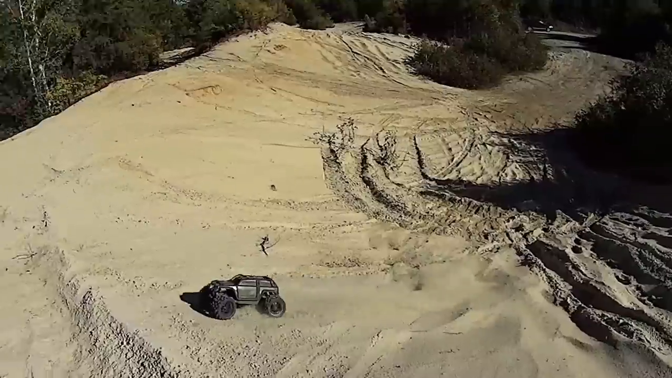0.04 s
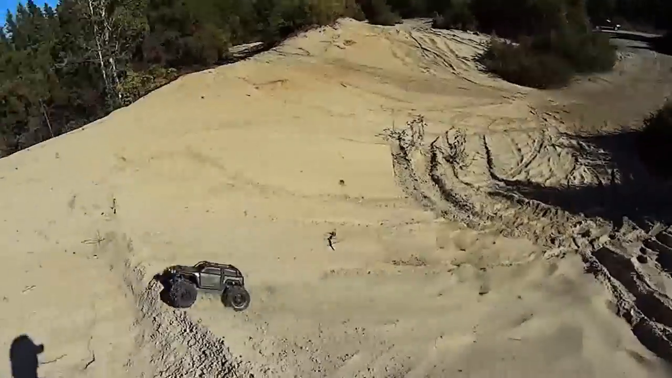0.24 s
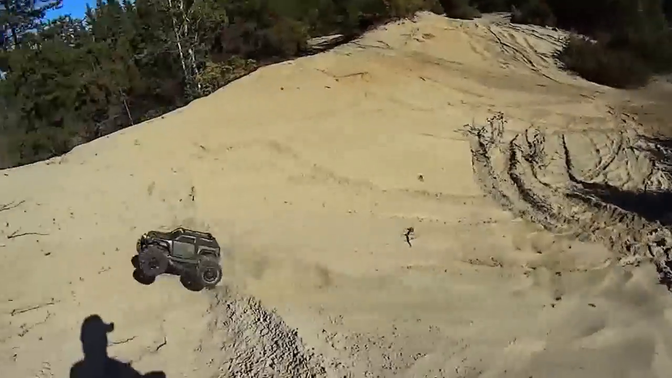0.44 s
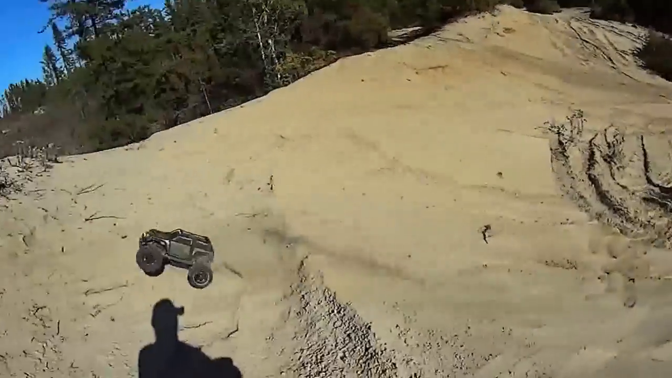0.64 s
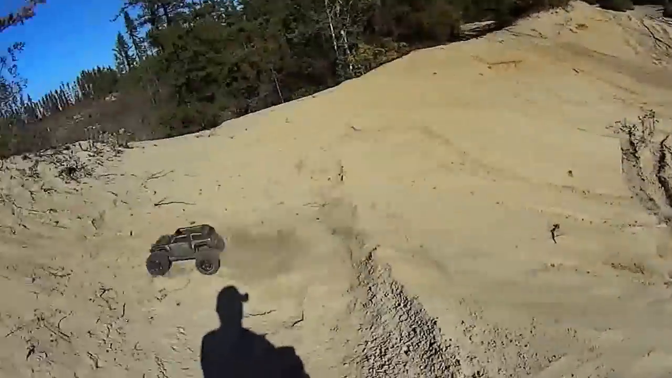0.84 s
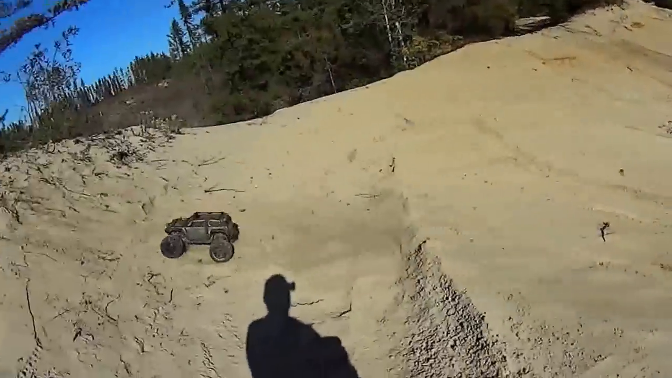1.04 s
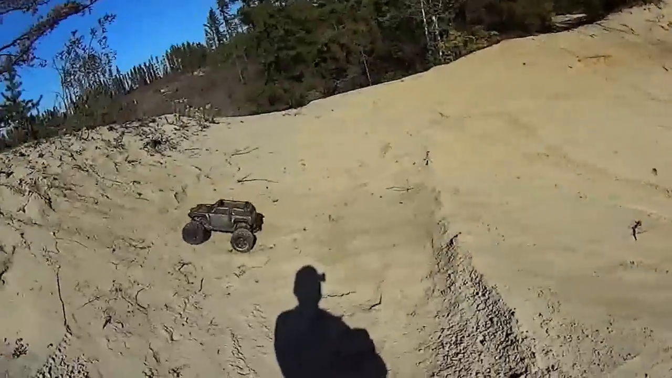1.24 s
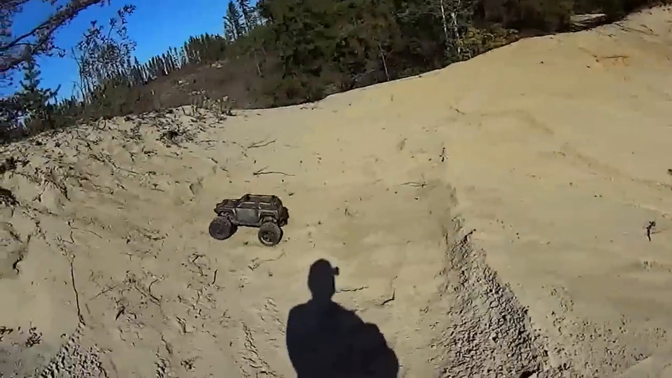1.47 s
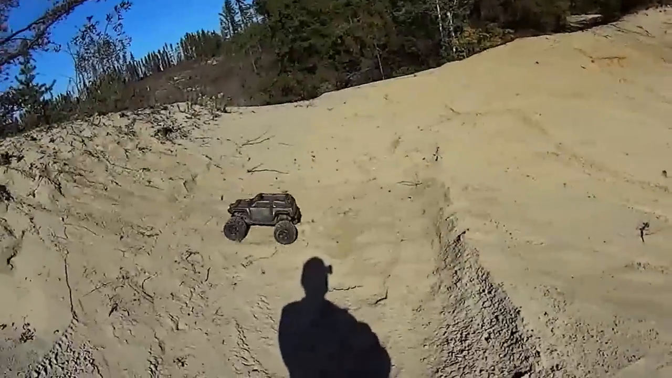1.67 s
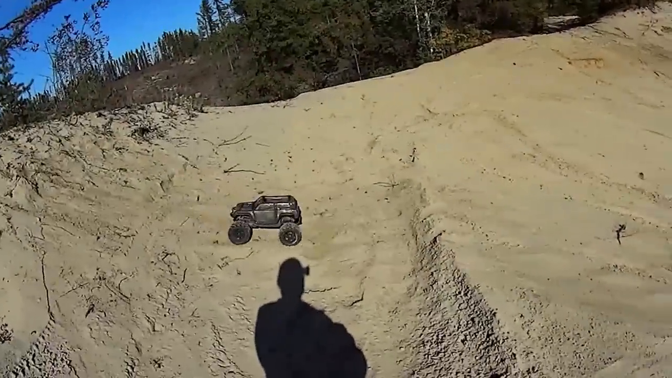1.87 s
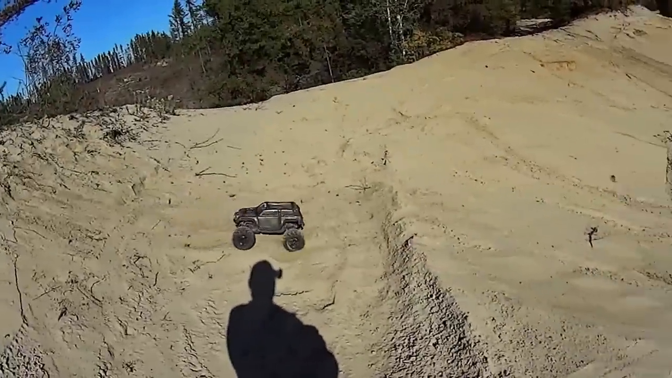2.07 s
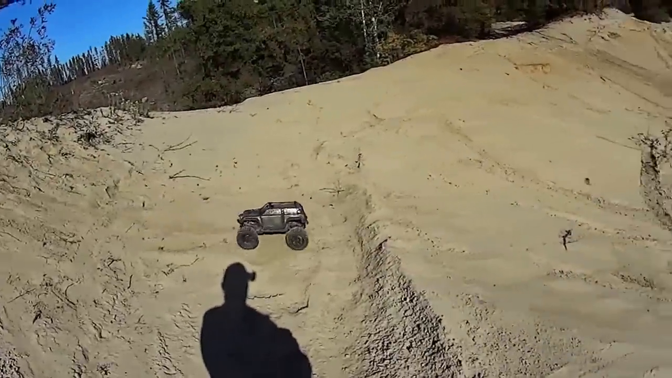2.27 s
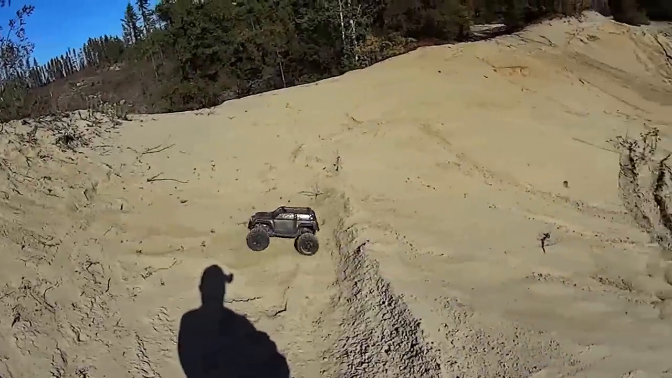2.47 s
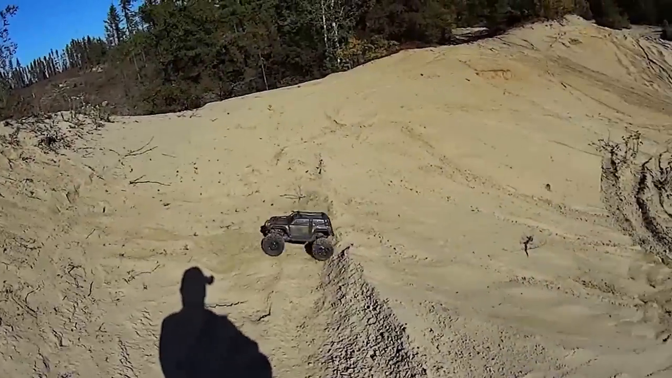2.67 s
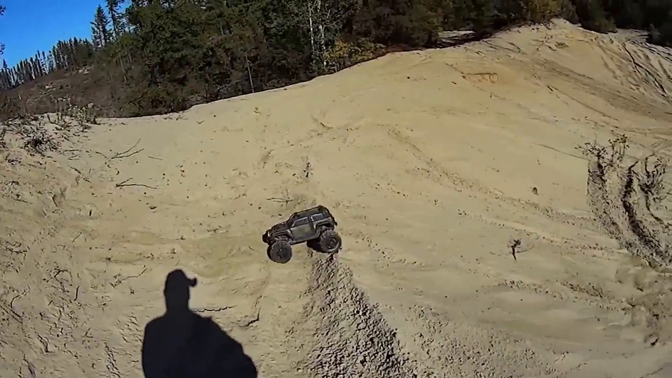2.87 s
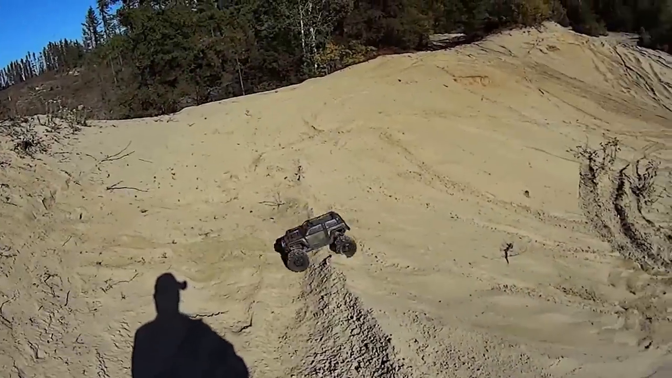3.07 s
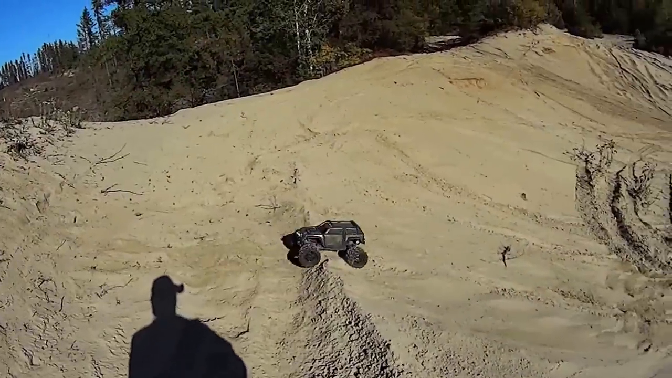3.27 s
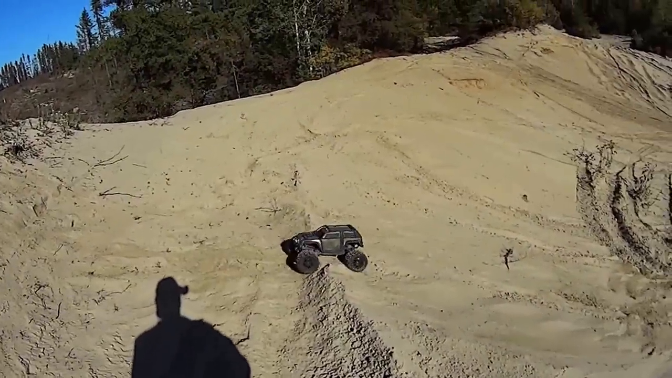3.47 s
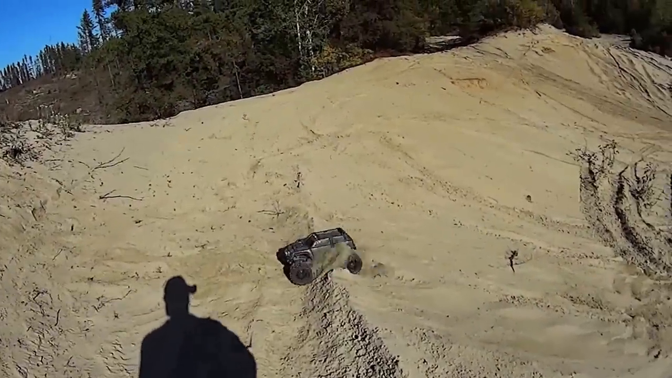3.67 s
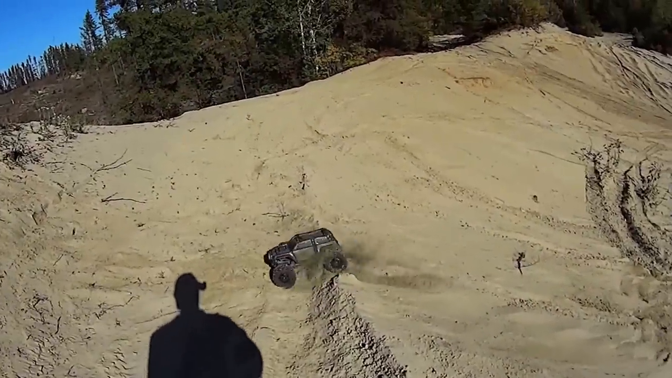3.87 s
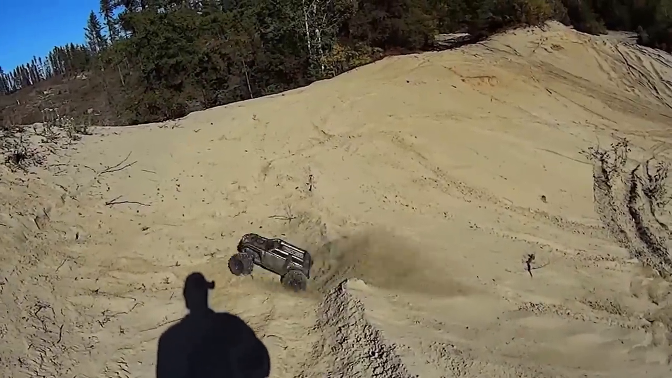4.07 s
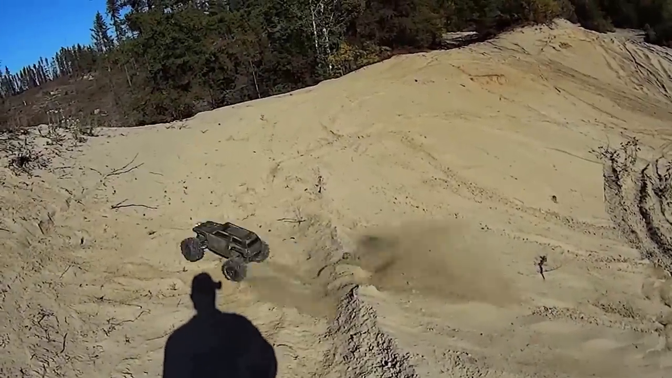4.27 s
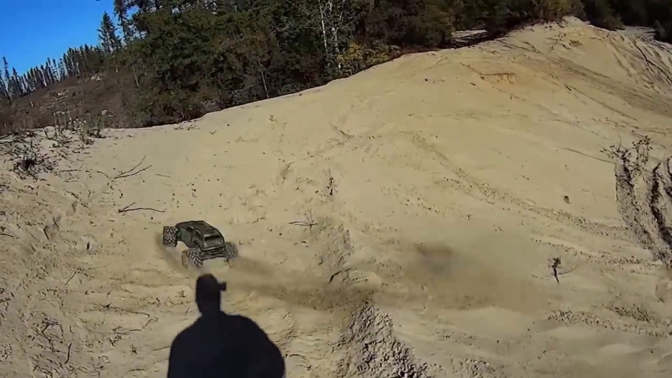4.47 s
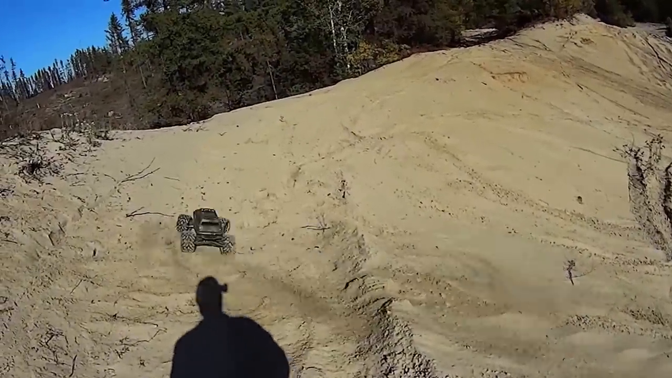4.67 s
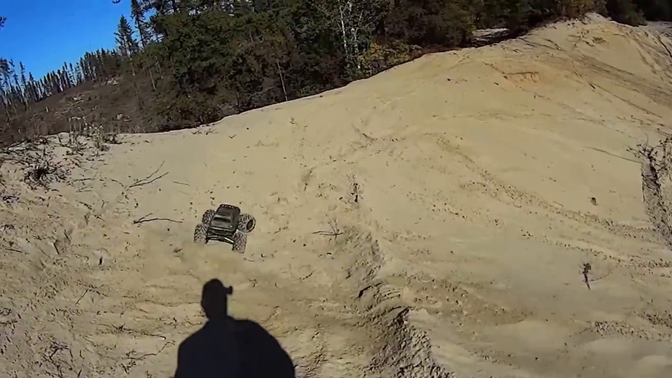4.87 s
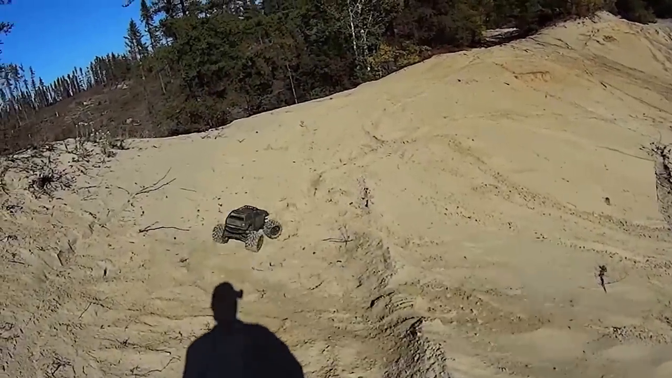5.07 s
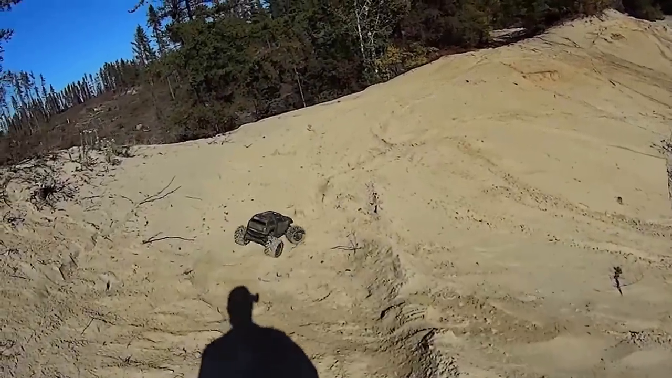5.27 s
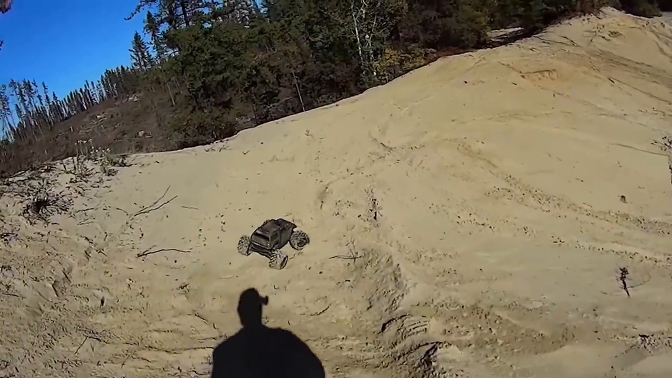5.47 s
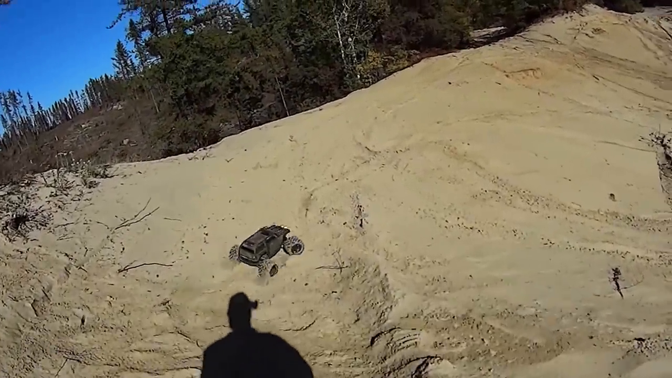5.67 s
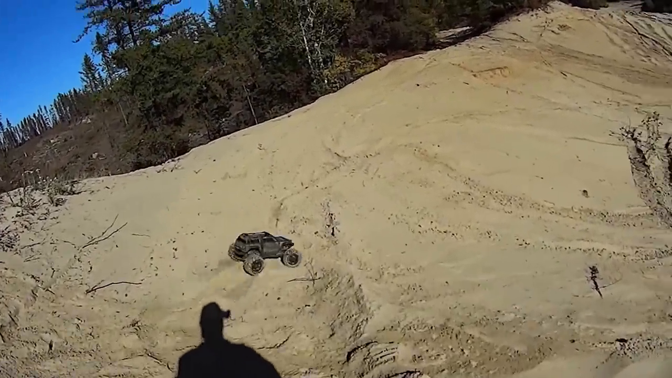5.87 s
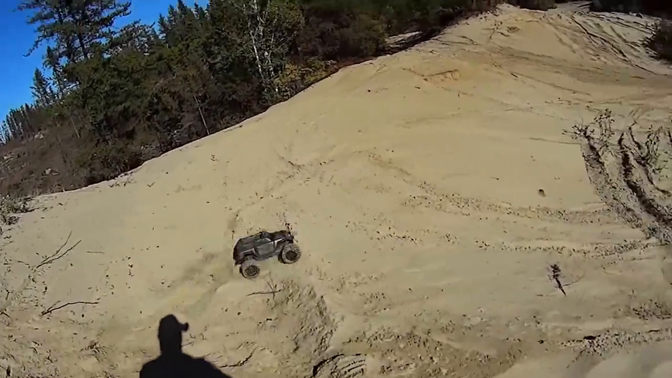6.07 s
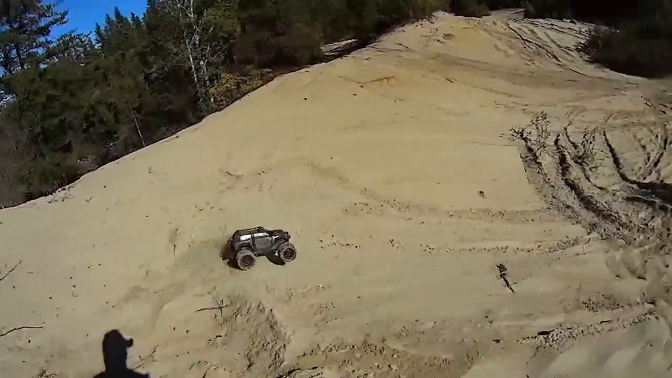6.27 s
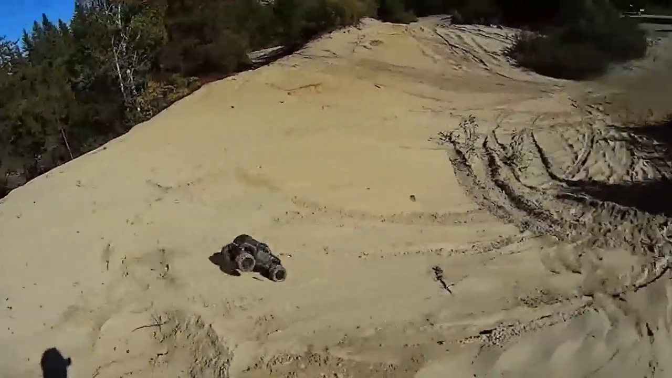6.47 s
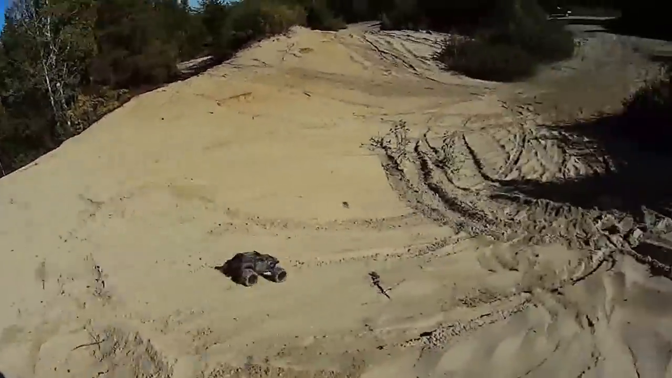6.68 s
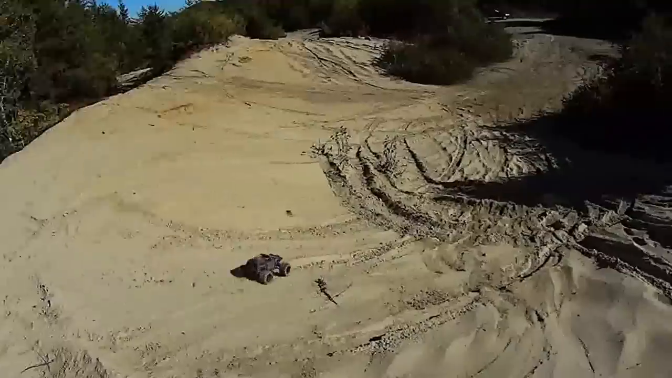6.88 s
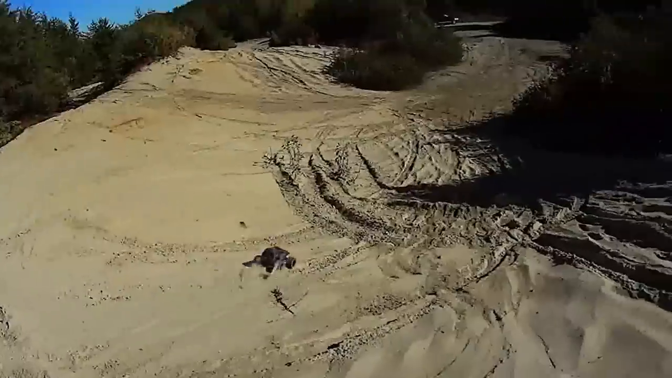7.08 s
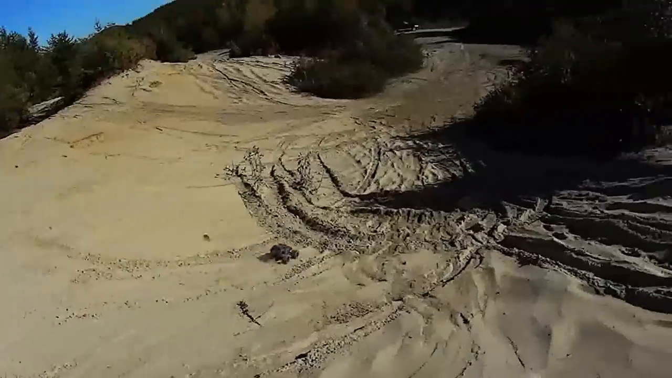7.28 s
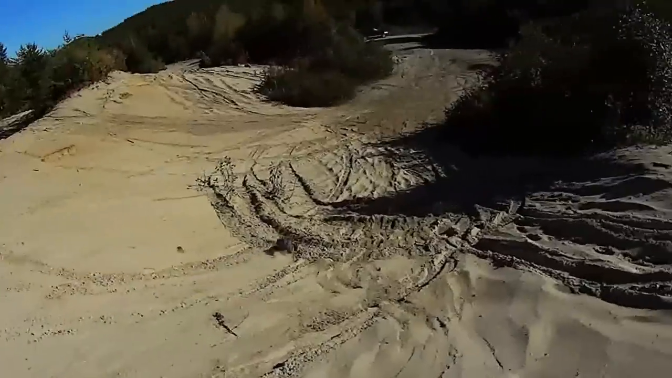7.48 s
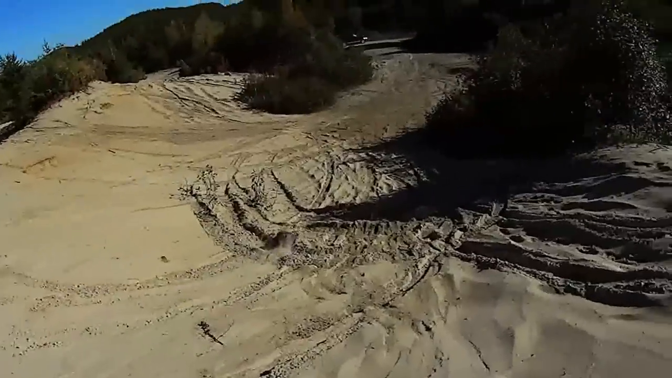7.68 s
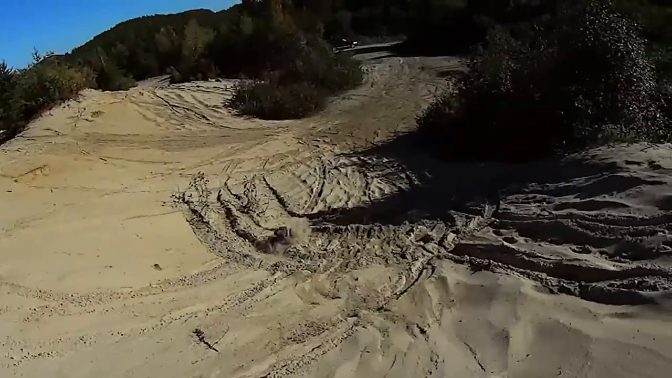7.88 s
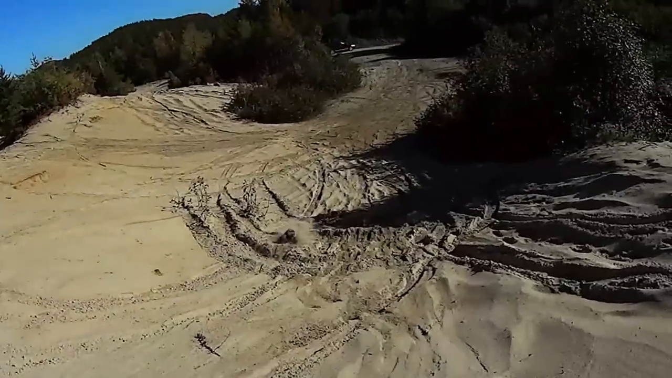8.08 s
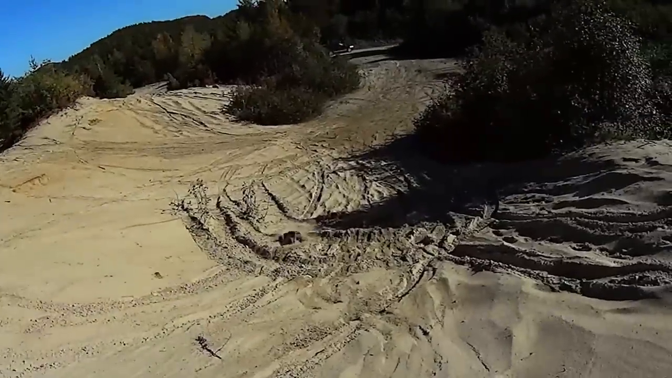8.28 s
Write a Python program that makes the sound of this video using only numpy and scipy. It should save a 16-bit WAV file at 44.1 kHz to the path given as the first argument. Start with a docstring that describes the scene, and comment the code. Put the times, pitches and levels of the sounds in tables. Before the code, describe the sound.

Outdoors on sand, a toy-sized electric truck screams, brakes with a rattle, creeps, stutters, races again, then whirs away in a rising final run.

```python
"""Electric model truck on sand

A remote-controlled truck runs three throttle bursts on a sand slope, a few metres away. Gear whine is summed
from shaft-speed multiples; grind, sand and tyres are shaped random impacts. Chatter, hull drone and tyres
drumming on ruts are impacts through resonances; rolling gears hold a wavering note. Stalled-motor kicks, thumps
and clacks are short decaying notes and noise bursts; a sine whistles at part throttle. Reflections, a stereo
pair and background air complete the scene."""
import sys
import numpy as np
from scipy import signal
from scipy.fft import rfft, irfft
from scipy.io import wavfile

SR = 44100
rng = np.random.default_rng(int(sys.argv[2]) if len(sys.argv) > 2 else 0)


def put_to_file(sound):
    """Save the sound as 16-bit audio at rate SR, in the file named by the first command-line argument."""
    columns = np.atleast_2d(sound).T  # one column per channel
    safe = np.clip(columns, -1, 1)
    whole_steps = np.round(safe * 32767)
    wavfile.write(sys.argv[1], SR, whole_steps.astype(np.int16))


N = 366912
T = np.arange(N) / SR
CLOCK = np.arange(0, N + 64, 64) / SR  # coarse time_s for slow gains
EDGE_HZ = 11170  # upper band limit

# Motor spins: whine_db, treble_db, overtone_db, comb_db (uneven teeth), axle_db, roughness_0_to_1,
# wobble_0_to_1 (bouncing wheels), speed curve [(time_s, tooth_hz)]
SPINS = [(-19, 9.5, -6, -6, 7, 0.045, 0.027, [(0, 5040), (0.16, 5015), (0.225, 5190), (0.268, 4950)]),
         (-21, -0.5, -3, -3, -8, 0.19, .004, [(0.278, 4800), (0.31, 4540), (0.335, 4650), (0.358, 4850)]),
         (-16.5, 10, -5, -14, -15, 0.048, .002, [(0.372, 4970), (0.408, 5240)]),
         (-19.5, -5, -6, -12, -10.5, 0.093, .004, [(0.415, 5300), (0.45, 5910), (0.487, 6530)]),
         (-21, 5, -5, -13, -6, 0.25, .004, [(3.497, 799), (3.52, 720), (3.535, 1216), (3.55, 1340)]),
         (-21, 2, -0.5, -8, -3, .15, 0.0091, [(3.555, 1450), (3.58, 1920), (3.612, 2386)]),
         (-21, 2, -1, 2, 3.5, 0.37, 0.015, [(3.62, 2692), (3.69, 3710), (3.74, 3800), (3.807, 3456),
         (3.86, 3720)]), (-20, -.5, -6, 3, -0.5, 0.27, 0.027, [(3.87, 3804), (3.92, 4404), (4.05, 4933),
         (4.09, 5020)]), (-19, 0, -5, 2, 9.5, 0.39, 0.0074, [(4.103, 4730), (4.135, 3780), (4.168, 2960)]),
         (-23, -4, 1, 5, -3.5, .5, 0.025, [(4.178, 2990), (4.195, 3996), (4.225, 4180), (4.25, 5100)]),
         (-26, -3, -6, -19, -8, 0.62, .01, [(5.53, 1008), (5.55, 715), (5.567, 887), (5.585, 700),
         (5.612, 950)]), (-22.5, -5.5, 2.5, -7, 0, 0.2, .003, [(5.62, 1110), (5.662, 1542), (5.684, 1540),
         (5.708, 1874), (5.726, 1699), (5.742, 1757), (5.766, 1667), (5.785, 1734), (5.808, 2010),
         (5.832, 1738), (5.854, 1953), (5.9, 2066), (5.918, 2050), (5.934, 1820)]),
         (-24.5, -7.5, 6, 3, 9, 0.36, .003, [(5.945, 1850), (5.968, 1786), (6.002, 2294)]),
         (-22.5, -4.5, 0.5, -0.5, 1.5, 0.21, .004, [(6.015, 1940), (6.035, 1977), (6.06, 1948),
         (6.09, 2220), (6.112, 2147), (6.138, 2144), (6.178, 1742), (6.2, 1813), (6.25, 2110),
         (6.266, 2224)]), (-26.5, -4, -1, -6, -2, 0.22, .005, [(6.326, 1854), (6.35, 1988)]),
         (-34.5, -12, 2, 9, 4, 0.22, 0.031, [(6.365, 2020), (6.41, 2140), (6.45, 1930), (6.49, 1904),
         (6.515, 2086)]), (-20, -12, -2, -14, -5, 0.17, 0.004, [(6.527, 2290), (6.543, 2140)]),
         (-34, -10, 10, 16, 3, 0.38, .025, [(6.56, 2000), (6.61, 2218), (6.675, 2890), (6.72, 3142),
         (6.74, 3715), (6.785, 4050)]), (-24.5, -9, 3.5, 1.5, -4, 0.057, 0.02, [(6.8, 4386), (6.85, 4396),
         (6.885, 4140), (6.92, 4433), (6.97, 4510)]), (-28.5, 5, 12.5, 7, 0, 0.22, 0.01, [(6.99, 4740),
         (7.065, 5537)]), (-34, -0.5, 1.5, -5, 7, 0.1, 0.0055, [(8.25, 1626), (8.262, 1310), (8.273, 766),
         (8.29, 1020), (8.3, 1275), (8.32, 1290)])]
# Gear tones: shaft_multiple, slow_db, fast_db
GEAR_TONES = [(2, -30, -6), (5, -24, -2), (7, -20, -24), (10, -24, -5), (15, -23, -11), (18, 0, 0),
              (20, -22, -10), (26, -25, -10), (36, -3.5, -4), (41, -15, -22), (46, -16, -30), (54, -7, -25),
              (59, -14, -40), (72, -6.5, -40), (90, -13, -40)]
# Falling zip as the brake stops the motor: start_s, level_db
BRAKE_ZIPS = [(0.881, -24), (4.484, -25.5)]
# Whine swell at the gearbox resonance: tooth_hz, gain_db
WHINE_GAIN = [(750, 0), (1100, 1), (1800, 6.5), (2050, 6.5), (2400, 1), (3000, -4), (4000, 1), (5100, -1),
              (6300, -0.5)]
# Gearbox radiation: frequency_hz, gain_db
HOUSING_GAIN = [(300, -4), (500, -1), (800, -4), (1250, 0), (1600, 0), (2050, 2), (2350, 0), (2650, -2),
                (2900, -9), (3300, -4), (3700, 1), (4100, 1.5), (4550, -3), (5000, 2.5), (5350, 3),
                (5900, -3), (7400, -1), (11000, -4)]
TEETH, AXLE_MULTIPLE = 18, 2
ZIP_S, ZIP_FROM_HZ, ZIP_TO_HZ = 0.014, 2600, 1108
BOUNCE_HZ, BOUNCE_SETTLE_S = 29, 0.3  # bouncing wheels load and unload the motor
DULL_DB_PER_OCTAVE, BRIGHT_HZ = 6, 1760  # below this tooth rate, teeth meet softly and treble fades
RACING_DB_PER_OCTAVE, RACING_HZ = -41, 5350  # above it, the unloaded pinion loses treble
RUNOUT_RAD = 0.35  # off-centre pinion: strands one shaft rate apart
RELEASE_SHARE = 0.04  # of spin length

# Throttle bursts: open_s, up_to_speed_s, shut_s, stop_s, tyre_db, grind_db, sand_db, rollout_drop_db
THROTTLE_BURSTS = [(0, 0, 0.46, 0.776, -29, -18.5, -20, -3.5), (3.61, 5, 4.29, 4.5, -23.5, -18, -18.5, -7),
                   (5.68, 6.5, 7.08, 7.735, -31, -21, -21.5, -11)]
# Slow moves: start_s, end_s, tyre_db, grind_db, sand_db, swell_db_per_s
SLOW_MOVES = [(0.816, 1.233, -44.5, -34, -39.5, -45), (1.433, 2.185, -52.5, -33, -44, 8),
              (2.294, 2.714, -52.5, -34, -40, 19), (2.77, 3.173, -55.5, -37, -47, 15),
              (3.245, 3.48, -43, -51, -47.5, 19), (4.538, 5.02, -50.5, -35.5, -41.5, -4),
              (5.11, 5.324, -52, -40.5, -42.5, 17), (5.486, 5.61, -43, -29, -36, 15),
              (7.783, 7.93, -53.5, -45.5, -49.5, -78), (8.083, 8.16, -66.5, -59, -47.5, 28),
              (8.19, 8.327, -54, -38, -43.5, 72)]
# Wheel digs into a rut: centre_s, tyre_db, grind_db, sand_db
RUT_HITS = [(0.776, -24, -33, -19.5), (1.21, -45.5, -35, -41.5), (2.15, -54, -41, -38.5),
            (2.41, -45, -33, -36.5), (2.688, -42, -29, -39), (4.17, -27, -39, -25), (4.8, -60, -41, -42),
            (5.18, -49, -35, -32), (5.439, -43, -50, -33), (6.39, -56, -20, -27), (7.41, -44, -44, -30.5),
            (7.55, -29, -40, -46), (7.699, -27.5, -27, -34)]
# Tyres leave the ground: centre_s, half_width_s, tyre_gain_db
TYRE_HOPS = [(0.527, 0.18, -10), (7.484, 0.032, -20)]
# Gain before the truck has speed: tyre_db, grind_db, sand_db
LOW_SPEED_DB = (-11.5, -2.5, -2.5)
OPEN_S, STOP_S, COAST_S = 0.15, 0.054, 0.2  # 20 dB: swell, burst decay, slow-move decay
SHUT_S, RUT_S = 0.12, 0.025  # rollout easing time, rut half width
ROLLOUT_TYRE_SHARE, GRIND_SWELL_SHARE = 0.33, 0.36

# Impact spectra: frequency_hz, level_db
RATTLE_SPECTRUM = [(200, -33), (380, -9), (530, 0), (750, -6), (1050, -2.5), (1610, 3.5), (1990, 0.5),
                   (2750, -15), (3150, -11), (3600, -20.5), (4150, -5.5), (4900, -23.5), (6300, -12.5),
                   (11000, -47)]
GRIND_SPECTRUM = [(350, -24.5), (600, -1.5), (874, -3), (962, -3), (1260, -1), (1530, 2.5), (1850, 3.5),
                  (2130, 7.5), (2380, -1), (2650, -1.5), (2970, -4.5), (3300, -6), (3700, -9), (4200, -4),
                  (4580, -27), (5040, -8), (6000, -6.5), (7800, -14), (13200, -120)]
SAND_SPECTRUM = [(300, -25), (1000, -19), (2200, 7), (2600, -5), (2950, 0.5), (3500, 0.5), (4300, 6),
                 (5500, 5.5), (7000, 3), (9000, 3), (11000, -1.5)]
TYRE_SPECTRUM = [(30, -40), (80, -13.5), (130, -8), (200, 0), (290, 4), (400, 3), (550, -2), (750, -4.5),
                 (1100, -14), (3000, -84)]
# Drivetrain chatter, braking or bouncing: start_s, length_s, level_db, centre_hz
CHATTER_VOLLEYS = [(0.448, 0.12, -15.5, 1210), (0.566, 0.021, -16, 1340), (0.574, 0.11, -18.5, 1260),
                   (0.657, 0.086, -15, 1260), (0.756, 0.034, -17.5, 1640), (0.829, 0.031, -16, 1590),
                   (0.876, 0.013, -15.5, 1430), (0.972, 0.041, -25, 1340), (2.292, 0.075, -27.5, 1570),
                   (2.645, 0.055, -31, 1590), (4.247, 0.036, -17, 1570), (4.297, 0.037, -19, 1600),
                   (4.361, 0.06, -17.5, 1600), (4.399, 0.051, -21.5, 1530), (4.473, 0.029, -18.5, 1700),
                   (5.171, 0.032, -33, 1390), (7.06, 0.039, -19, 1860), (7.385, 0.058, -33, 1628)]
# Gears singing in a slow roll: start_s, end_s, level_db, pitch_hz
ROLL_NOTES = [(1.386, 1.542, -38.5, 1678), (1.619, 1.714, -37, 1566), (1.742, 2.057, -38.5, 1605),
              (2.071, 2.157, -31.5, 1860), (2.792, 3.172, -47.5, 1590), (4.613, 4.947, -47, 1870),
              (5.2, 5.319, -43, 1477)]
# Drones: the hull in a skid or a turn, then tyres drumming over ruts (last row): start_s, end_s, level_db,
# centre_hz
DRONES = [(0.477, 0.73, -32.5, 860), (5.676, 6.41, -42.5, 730), (6.45, 6.721, -28, 826),
          (7.199, 7.42, -38, 215)]
# Stalled-motor kicks: start_s, knock_db
MOTOR_KICKS = [(3.218, -31), (3.258, -29), (3.316, -28.5), (3.363, -30.5), (3.404, -26), (3.45, -25.5),
               (3.485, -23.5)]
# Controller whistle at part throttle: start_s, end_s, level_db
CONTROLLER_WHISTLES = [(3.27, 3.58, -43.5), (5.52, 5.64, -54)]
# Tyre and chassis hits: start_s, level_db, nominal_hz
GROUND_THUMPS = [(0.747, -18, 184), (0.774, -27, 245), (0.796, -17, 186), (0.835, -23, 510),
                 (4.127, -16, 207), (4.155, -10, 320), (4.204, -11, 320), (4.226, -17, 237),
                 (4.516, -16, 286), (6.635, -18, 260), (7.529, -35, 307), (7.573, -27, 280),
                 (7.655, -20, 220), (7.694, -12, 149), (7.734, -14.5, 340)]
# Plastic clacks and pebble ticks: start_s, level_db, treble_db
HARD_CLACKS = [(0.8747, -13, 0), (1.056, -25, -3), (1.338, -36, 0), (2.2432, -31, 3), (2.758, -28, 0),
               (2.911, -30, -8), (2.973, -29, -20), (5.031, -25, -20), (5.551, -23.5, -3), (7.7347, -12, 0),
               (8.115, -32, -9), (8.132, -38, -2), (8.24, -35, 3)]

# Treble hollow, moving with the truck's place on the slope: time_s, centre_hz
TREBLE_HOLLOW = [(0, 3040), (1.5, 2900), (2.6, 2530), (3.7, 2600), (4.1, 3000), (5.7, 2600), (6.3, 2660),
                 (6.8, 3080), (8.3, 3160)]
# Lower hollow while the truck turns away: start_s, end_s, centre_hz, width_hz, depth_0_to_1
TURN_HOLLOW = (5.97, 6.6, 990, 230, 0.49)
# Microphone likeness: frequency_hz, likeness_0_to_1
MIC_LIKENESS = [(60, .75), (125, .9), (500, .88), (1000, .92), (11000, .89)]
# Microphone balance: frequency_hz, left_minus_right_db
MIC_BALANCE = [(60, 0), (125, 2), (250, 3.5), (500, 8.5), (1000, 6), (2000, 3.2), (4000, 4.7), (8000, 2),
               (11000, 3)]
# Microphone phase: frequency_hz, left_lead_rad
MIC_LEAD = [(100, 0), (260, .8), (600, 1), (900, .3), (1200, -.5), (2100, -.1), (2700, -.5), (3200, .7),
            (4200, .2), (5600, 0), (11000, 0)]
# Background air spectrum: frequency_hz, level_db
AIR_SPECTRUM = [(12, -55), (20, -3), (64, -2.5), (137, -9.5), (179, -5.5), (872, -8.5), (2030, -21),
                (2640, -11.5), (3930, -18.5), (11000, -27.5), (14300, -57), (22000, -120)]


def whine(rough_hz=15000, smear=0.011, comb_slow_db=-22, comb_fast_db=-15, fade_s=0.008,
          cog_hz=36, flutter_db=2.2):
    """Meshing teeth sing at shaft-speed multiples; uneven teeth add a weak, rough comb."""
    out = np.zeros(N)
    shake = 1 + 0.006 * wander(45) + 0.005 * wander(250)  # ruts and backlash
    flutter = flutter_db * wander(10.7)
    named = {round(k): (slow_db, fast_db) for k, slow_db, fast_db in GEAR_TONES}
    comb = [*range(2, 2 * TEETH), *range(2 * TEETH, 4 * TEETH, 3)]
    multiples = sorted({*named, *comb})
    zips = [(db, 0, 0, 0, 0, 0.6, 0, [(s, ZIP_FROM_HZ), (s + ZIP_S, ZIP_TO_HZ)]) for s, db in BRAKE_ZIPS]
    for db, treble_db, overtone_db, comb_db, axle_db, rough, wobble, speed in SPINS + zips:
        s, hz = np.transpose(speed)
        release_s = max(fade_s, RELEASE_SHARE * (s[-1] - s[0]))
        on = (T > s[0] - fade_s) & (T < s[-1] + release_s)
        t = T[on]
        tooth_hz = np.interp(t, s, hz)
        shaft_hz = tooth_hz / TEETH
        settle = np.exp(-((t - s[0]) / BOUNCE_SETTLE_S) ** 2)
        bounce = wobble * np.sin(2 * np.pi * BOUNCE_HZ * (t - s[0])) * settle
        turns = np.cumsum(shaft_hz * (shake[on] + bounce)) / SR
        runout = RUNOUT_RAD * np.sin(2 * np.pi * turns)
        fast = np.interp(shaft_hz, [130, 190], [0, 1])
        bright_db = treble_db + DULL_DB_PER_OCTAVE * np.minimum(np.log2(tooth_hz / BRIGHT_HZ), 0)
        bright_db += RACING_DB_PER_OCTAVE * np.maximum(np.log2(tooth_hz / RACING_HZ), 0)

        tones, power = 0, 1e-9
        for k in multiples:
            slow_db, fast_db = named.get(k, (comb_slow_db + comb_db / 2, comb_fast_db + comb_db))
            f = k * shaft_hz
            gain_db = slow_db + fast * (fast_db - slow_db) + read(HOUSING_GAIN, f)
            gain_db += bright_db * np.clip(f / 1000 - 2, 0, 1)
            gain_db += overtone_db * (k >= 2 * TEETH) + axle_db * (k == AXLE_MULTIPLE)
            gain = amp(gain_db) * (f < EDGE_HZ)
            base_share = rough if k in named else 0.4
            share = np.clip(base_share + (f / rough_hz) ** 2, 0, 0.75)  # high tones are rougher
            offset = round(rng.random() * N / 2)
            waver = unit(amp(flutter[offset:][:len(t)]))  # each tone comes and goes
            angle = 2 * np.pi * (k * turns + rng.random()) + runout * k / TEETH
            tones += gain * waver * fuzzy(angle, share, np.clip(smear * f.mean(), 15, 250))
            power += gain ** 2 / 2 * (k in named)

        # motor pulls in jerks just above standstill
        cog_depth = np.interp(shaft_hz, [45, 75], [0.55, 0])
        cogging = 1 + cog_depth * np.sin(2 * np.pi * cog_hz * (t - t[0]))
        gate = np.clip(np.minimum((t - s[0]) / fade_s, (s[-1] - t) / release_s) + 1, 0, 1)
        out[on] += amp(db + read(WHINE_GAIN, tooth_hz)) * gate * cogging * tones / np.sqrt(power)
    return panels(out)


def panels(x):
    """Thin shell panels ring in many close modes, so gliding treble tones flutter and break up."""
    t = np.arange(SR // 25) / SR
    modes = rng.standard_normal(len(t)) * np.exp(-t / 0.009)
    modes /= np.linalg.norm(modes)
    hz = np.fft.rfftfreq(N, 1 / SR)
    share = 0.1 / (1 + (2700 / (hz + 1)) ** 8)
    response = np.sqrt(1 - share) + np.sqrt(share) * rfft(modes, N)
    return irfft(rfft(x) * response, N)


def drive(axis, uneven_db=1.53, uneven_rate_hz=12):
    """Gain of tyres (axis 0), grind (1) or sand (2) through bursts, slow moves and ruts."""
    t, power = CLOCK, 1e-9
    for start, fast, shut, stop, *levels, drop_db in THROTTLE_BURSTS:
        drop_share = ROLLOUT_TYRE_SHARE if axis == 0 else 1
        db = levels[axis] + drop_db * np.clip((t - shut) / SHUT_S, 0, 1) * drop_share
        speed = np.clip(1 + (t - fast) / max(fast - start, OPEN_S), 0, 1)
        db = db + LOW_SPEED_DB[axis] * (1 - speed ** 2)
        power += (amp(db) * stretch(start, stop, OPEN_S, STOP_S)) ** 2
    for start, end, *levels, swell in SLOW_MOVES:
        from_middle_s = np.clip(t, start, end) - (start + end) / 2
        db = levels[axis] + swell * from_middle_s * (GRIND_SWELL_SHARE if axis == 1 else 1)
        power += (amp(db) * stretch(start, end, OPEN_S, COAST_S)) ** 2
    for s, *levels in RUT_HITS:
        power += (amp(levels[axis]) * bump(s, RUT_S)) ** 2
    hop_db = sum(db * bump(s, half) for s, half, db in TYRE_HOPS) if axis == 0 else 0
    level = np.interp(T, t, np.sqrt(power) * amp(hop_db))
    return level * amp(uneven_db * wander(uneven_rate_hz))


def grind(creep_db=-4.5, hard_db=-2, idle_db=-34, full_db=-24, lumpy_db=1.0, throb_hz=55):
    """Loose teeth knock on the plastic gearbox: throbbing rattle at low level, dense grind under load."""
    level = drive(axis=1)
    load = np.interp(20 * np.log10(level), [idle_db, full_db], [0, 1])
    throb_angle = 2 * np.pi * np.cumsum(throb_hz * (1 + 0.2 * wander(6))) / SR
    throb = 1 + 0.5 * np.sin(throb_angle)
    rattle = colour(clicks(2500, 1.3) * throb * amp(lumpy_db * wander(24)), RATTLE_SPECTRUM)
    dense = colour(clicks(7000, 1.5) * amp(wander(32)), GRIND_SPECTRUM)
    return level * (amp(creep_db) * np.sqrt(1 - load) * rattle + amp(hard_db) * np.sqrt(load) * dense)


def rolling(rough=0.72, width_hz=130, sway=0.0261, rise_s=0.033, fall_s=0.044):
    """Lightly loaded gears hold a soft, wavering note."""
    out, waver = np.zeros(N), 1 + sway * wander(25)
    for start, end, db, hz in ROLL_NOTES:
        on = (T > start - 3 * rise_s) & (T < end + 3 * fall_s)
        tone = fuzzy(2 * np.pi * np.cumsum(hz * waver[on]) / SR, rough, width_hz)
        envelope = np.interp(T[on], CLOCK, stretch(start, end, rise_s, fall_s))
        out[on] += amp(db) * envelope * tone
    return out


def sand(level_db=-1, clumps_db=2.5, pebbles_db=-12):
    """Fine sand sprays from the tyres in clumps; coarser grains tick against the shell."""
    fine = clicks(20000, 1.8) * amp(clumps_db * wander(58))
    pebbles = amp(pebbles_db) * clicks(400, 9)
    return amp(level_db) * drive(axis=2) * colour(fine + pebbles, SAND_SPECTRUM)


def tyres(lumpy_db=1.5):
    """Tread blocks drum on the sand as random low impacts."""
    impacts = clicks(1800, 3.1) * amp(lumpy_db * wander(25.4))
    return drive(axis=0) * colour(impacts, TYRE_SPECTRUM)


def chatter(level_db=-2, width_hz=1100, rasp_db=-6, hull_hz=850, hull_width_hz=970, hull_db=-5):
    """Short volleys of tooth impacts ring the gearbox and hull, with a bright rasp on top."""
    out, teeth = np.zeros(N), clicks(3000, 2.7)
    hull = unit(ring(ring(teeth, hull_hz, hull_width_hz), hull_hz, hull_width_hz))
    rasp_and_hull = amp(rasp_db) * colour(teeth, SAND_SPECTRUM) + amp(hull_db) * hull
    for s, length, db, hz in CHATTER_VOLLEYS:
        part = slice(round(s * SR), round((s + length) * SR))
        gearbox = unit(ring(ring(teeth[part], hz, width_hz), hz, width_hz))
        window = signal.windows.tukey(len(gearbox), 0.97)
        add(out, s, amp(db + level_db) * unit(gearbox + rasp_and_hull[part]) * window)
    return out


def growl(width_hz=170, sway=0.093, sway_rate_hz=16, rise_s=0.031, fall_s=0.24):
    """Impacts excite the hollow hull, and later the tyres drum over ruts; the note sways as it rings."""
    level = sum(amp(db) * stretch(start, end, rise_s, fall_s) for start, end, db, hz in DRONES)
    points = [(s, hz) for start, end, db, hz in DRONES for s in (start, end)]
    centre_hz = np.interp(T, *np.transpose(points)) * (1 + sway * wander(sway_rate_hz))
    drone = resonate(clicks(1200, 4.9), centre_hz, width_hz)
    drone = resonate(drone, centre_hz, width_hz)
    return np.interp(T, CLOCK, level) * unit(drone)


def stutter(level_db=-1, rise_s=0.0063, hum_hz=370, hum_db=-30.5, hum_delay_s=0.019,
            hum_length_s=0.0086, spurt_db=-12):
    """Each stalled-motor kick rattles the gears and spurts sand, then the drivetrain hums briefly."""
    out, t = np.zeros(N), np.arange(SR // 12) / SR
    for s, db in MOTOR_KICKS:
        noise = rng.standard_normal(len(t))
        knock = colour(noise, RATTLE_SPECTRUM) + amp(spurt_db) * colour(noise, SAND_SPECTRUM)
        knock *= (t / rise_s) ** 2 * np.exp(2 - 2 * t / rise_s)
        hum = np.sin(2 * np.pi * hum_hz * t * (1 - 0.5 * t))
        hum *= np.exp(-((t - hum_delay_s) / hum_length_s) ** 2)
        add(out, s, amp(db + level_db) * knock + amp(hum_db) * hum)
    return out


def controller(hz=8021, rise_s=0.12, fall_s=0.04):
    """The speed controller's switching whistles in the windings at part throttle."""
    level = sum(amp(db) * stretch(start, end, rise_s, fall_s) for start, end, db in CONTROLLER_WHISTLES)
    return np.interp(T, CLOCK, level) * amp(4.3 * wander(40)) * np.sin(2 * np.pi * hz * T)


def knocks(level_db=1, thump_rise_s=0.0027, thump_decay_s=0.0063, clack_decay_s=0.0026):
    """Soft tyres thump with a sagging note; hard parts clack as noise bursts."""
    out, t = np.zeros(N), np.arange(SR // 10) / SR
    for s, db, hz in GROUND_THUMPS:
        note = np.sin(2 * np.pi * hz * t * (1.08 - 3 * t))
        envelope = np.exp(-t / thump_decay_s) * (1 - np.exp(-t / thump_rise_s))
        add(out, s, amp(db + level_db) * note * envelope)
    for s, db, treble_db in HARD_CLACKS:
        noise = rng.standard_normal(len(t))
        burst = unit(colour(noise, RATTLE_SPECTRUM) + amp(treble_db) * colour(noise, SAND_SPECTRUM))
        add(out, s, amp(db + level_db) * burst * np.exp(-t / clack_decay_s))
    return out


def slope(x, echo_db=-22):
    """The dune and the trees scatter a faint short tail."""
    t = np.arange(SR // 3) / SR
    tail = rng.standard_normal(len(t)) * amp(-60 * t / 0.33) * (t > 0.005)
    return x + amp(echo_db) * signal.fftconvolve(x, tail / np.linalg.norm(tail))[:N]


def hollow(x, depth=0.92, width_hz=330, ease_s=0.19):
    """Sound glancing off the sand cancels narrow bands, which move as the truck does."""
    x = x - depth * resonate(x, np.interp(T, *np.transpose(TREBLE_HOLLOW)), width_hz)
    start, end, low_hz, low_width_hz, low_depth = TURN_HOLLOW
    low_gain = low_depth * np.interp(T, CLOCK, stretch(start, end, ease_s, ease_s))
    return x - low_gain * resonate(x, low_hz, low_width_hz)


def microphones(x):
    """Two ports hear direct sound with their own colour and phase, plus unlike ground reflections."""
    hz, t = np.fft.rfftfreq(N, 1 / SR), np.arange(SR // 10) / SR
    near = rng.standard_normal(len(t)) * np.exp(-t / 0.022)
    near /= np.linalg.norm(near)
    same = np.clip(read(MIC_LIKENESS, hz), 0, 1)
    direct = np.sqrt((1 + same) / 2)
    scattered = np.sqrt((1 - same) / 2) * rfft(near, N)
    port = amp(read(MIC_BALANCE, hz) / 2) * np.exp(0.5j * read(MIC_LEAD, hz))
    pair = np.array([(direct + scattered) * port, (direct - scattered) / port])
    return irfft(rfft(x) * pair / abs((port + 1 / port) / 2), N)


def air(part_db=-54):
    """Steady coloured noise, partly shared between the channels, with a slowly wandering level."""
    shared, left, right = (colour(rng.standard_normal(N), AIR_SPECTRUM) for part in range(3))
    return (shared + 1.3 * np.array([left, right])) * amp(part_db + 2 * wander(8))


def amp(db):
    """Decibels to amplitude."""
    return 10 ** (np.asarray(db) / 20)


def unit(x):
    """Scales to rms 1."""
    return x / np.sqrt(np.mean(x ** 2) + 1e-20)


def read(points, hz):
    """Interpolates a (frequency_hz, value) table on a log-frequency axis."""
    f, value = np.transpose(points)
    return np.interp(np.log(hz + 1), np.log(f + 1), value)


def colour(x, points):
    """Filters x by a spectrum; rms 1."""
    gain = amp(read(points, np.fft.rfftfreq(len(x), 1 / SR)))
    return unit(irfft(rfft(x) * gain, len(x)))


def wander(rate_hz):
    """Low-passed noise up to about rate_hz; rms 1."""
    f = np.fft.rfftfreq(N, 1 / SR)
    return unit(irfft(rfft(rng.standard_normal(N)) / (1 + (f / rate_hz) ** 4), N))


def clicks(rate_hz, spread_db):
    """Random impacts, most small and a few large; rms 1."""
    size_db = spread_db * np.minimum(rng.exponential(1, N), 4)
    size = amp(size_db) * rng.choice([-1, 1], N)
    return unit(size * (rng.random(N) < rate_hz / SR))


def ring(x, hz, width_hz):
    """One fixed resonance."""
    return signal.lfilter(*signal.iirpeak(hz, hz / width_hz, SR), x)


def resonate(x, hz, width_hz):
    """One resonance of gain 1 that follows the curve hz."""
    turn = np.exp(2j * np.pi * np.cumsum(hz * np.ones(N)) / SR)
    r = np.exp(-np.pi * width_hz / SR)
    return 2 * (turn * signal.lfilter([1 - r], [1, -r], x / turn)).real


def fuzzy(angle, share, width_hz):
    """A tone of which a power share is smeared into a narrow band."""
    lowpass = signal.butter(2, width_hz, fs=SR, output="sos")
    scatter = signal.sosfilt(lowpass, rng.standard_normal((2, len(angle))))
    real, imag = unit(scatter) * np.sqrt(share / 2)
    return (np.sqrt(1 - share) + real) * np.cos(angle) + imag * np.sin(angle)


def stretch(start, end, rise_s, fall_s):
    """Gain that swells 20 dB in rise_s, holds from start to end, and dies 20 dB in fall_s."""
    outside = np.maximum((start - CLOCK) / rise_s, (CLOCK - end) / fall_s)
    return amp(-20 * np.clip(outside, 0, 10))


def bump(s, half_s):
    """A smooth bump of height 1."""
    return np.exp(-np.minimum(((CLOCK - s) / half_s) ** 2, 50))


def add(mix, s, sound):
    """Adds a sound to the mix at s seconds."""
    part = mix[max(round(s * SR), 0):][:len(sound)]
    part += sound[:len(part)]


def scene():
    """Sums the truck's sources, passes them over the slope to the microphones and adds air."""
    gears = whine() + grind() + rolling() + chatter() + stutter()
    ground = sand() + tyres() + knocks()
    truck = gears + ground + growl() + controller()
    return microphones(hollow(slope(truck))) + air()


def record(dry):
    """Rounds off the highest peaks, then limits the band."""
    rounded = dry / (1 + (dry / 0.75) ** 4) ** (1 / 4)
    lowpass = signal.firwin(511, EDGE_HZ, window=("kaiser", 9), fs=SR)
    return signal.oaconvolve(rounded, lowpass[None], "same", axes=1)


dry = scene()
out = record(dry)
put_to_file(out)
```